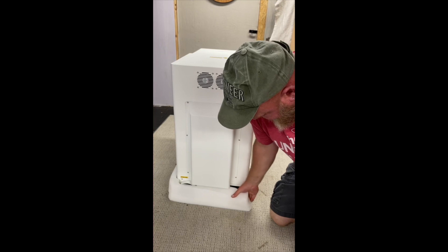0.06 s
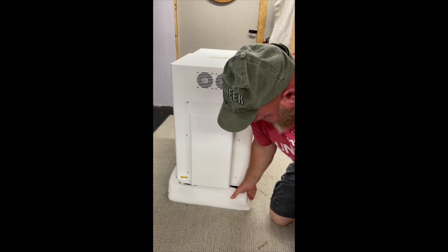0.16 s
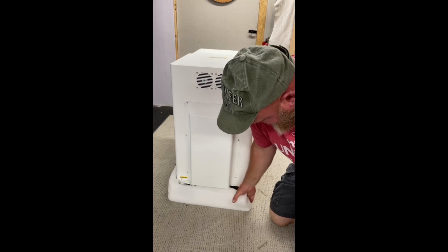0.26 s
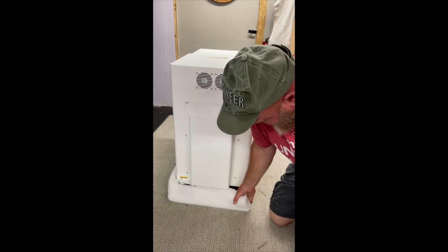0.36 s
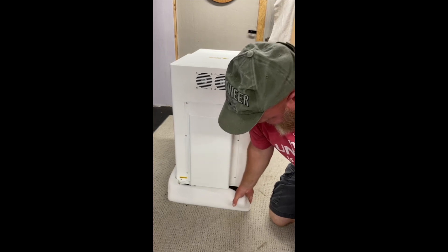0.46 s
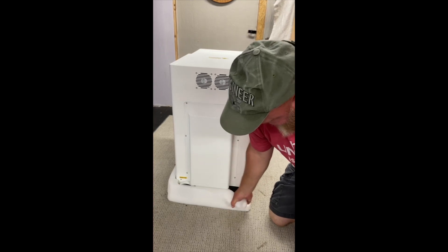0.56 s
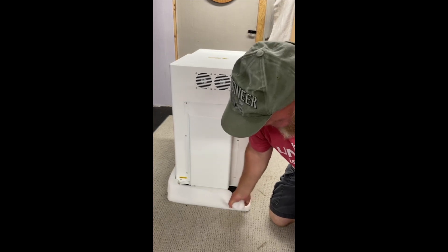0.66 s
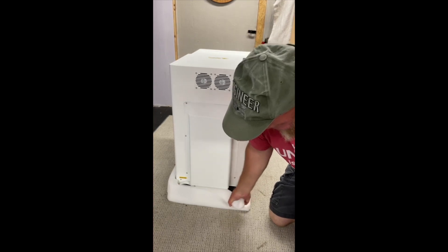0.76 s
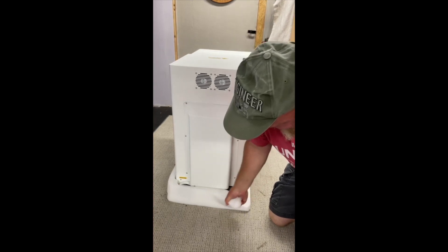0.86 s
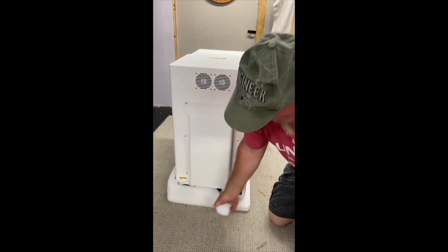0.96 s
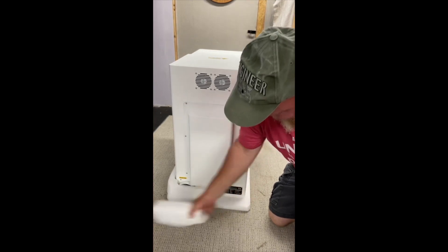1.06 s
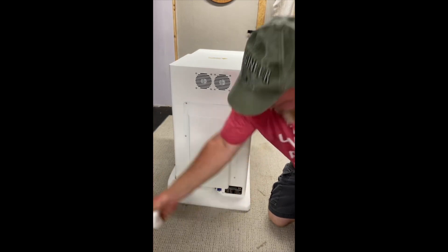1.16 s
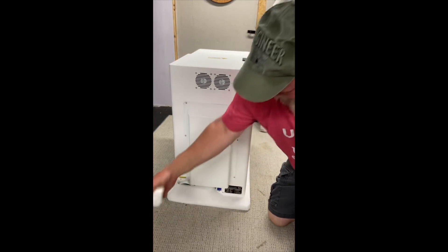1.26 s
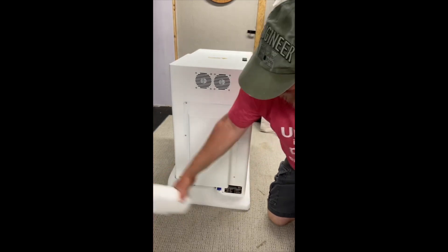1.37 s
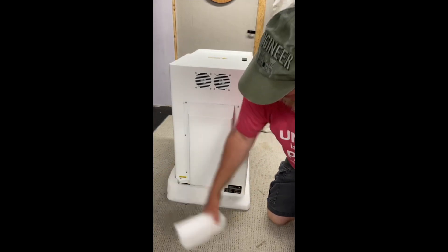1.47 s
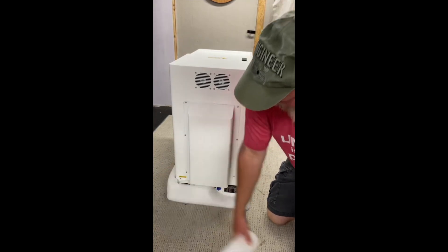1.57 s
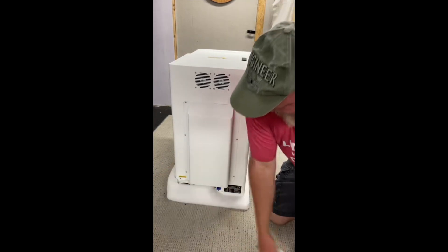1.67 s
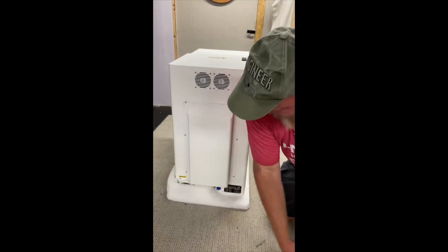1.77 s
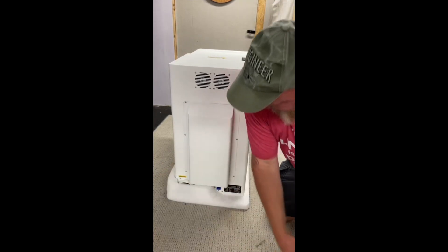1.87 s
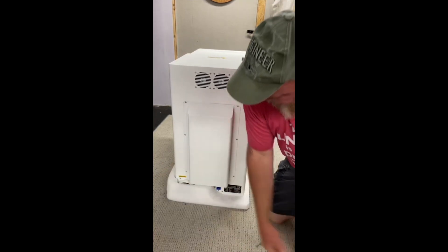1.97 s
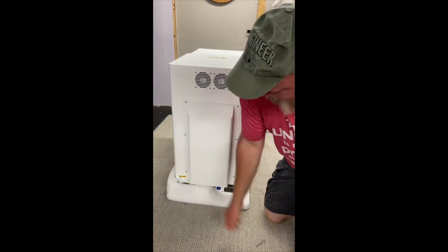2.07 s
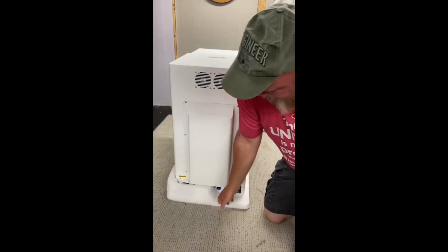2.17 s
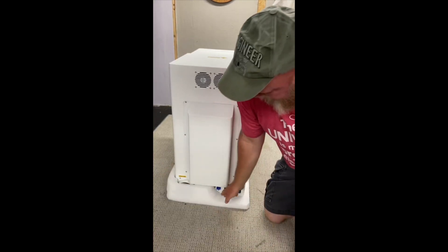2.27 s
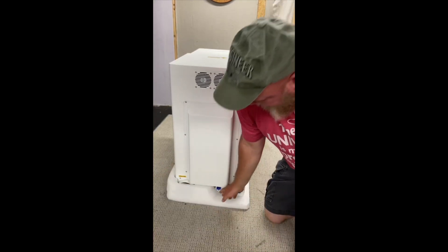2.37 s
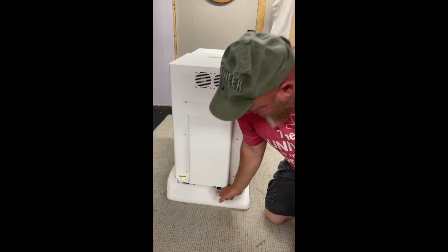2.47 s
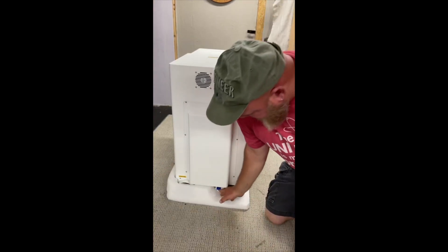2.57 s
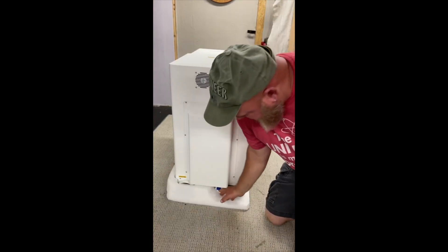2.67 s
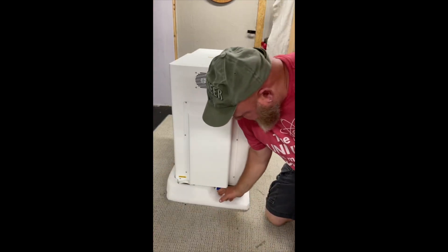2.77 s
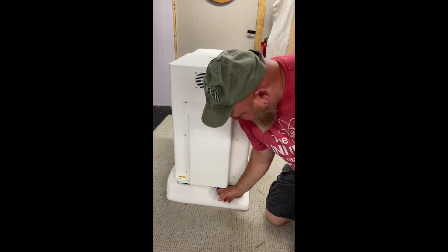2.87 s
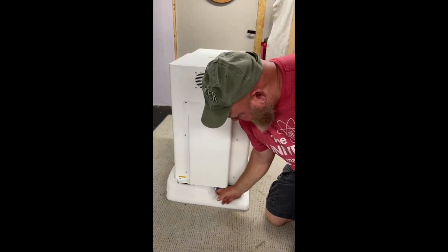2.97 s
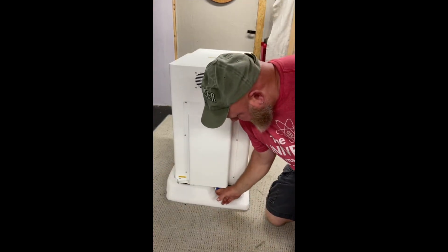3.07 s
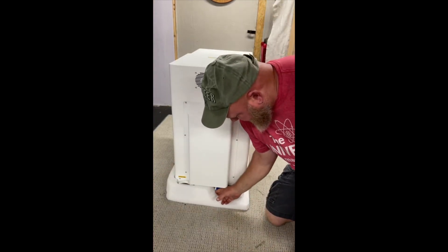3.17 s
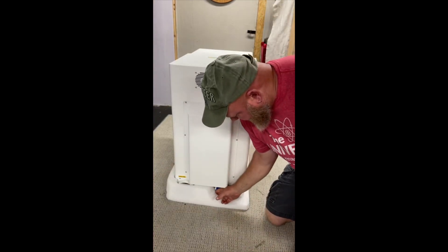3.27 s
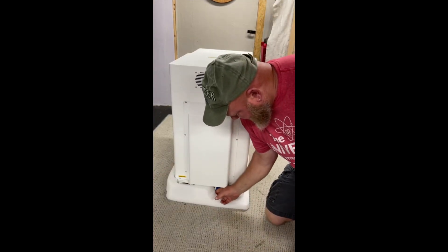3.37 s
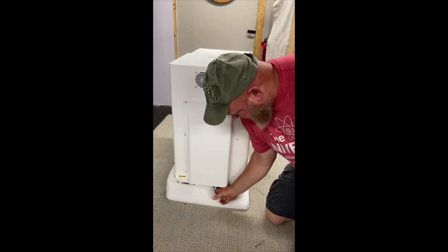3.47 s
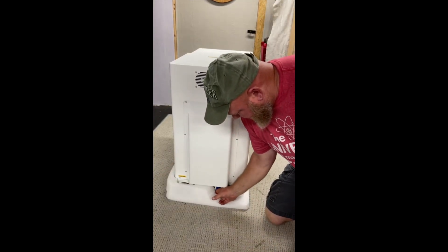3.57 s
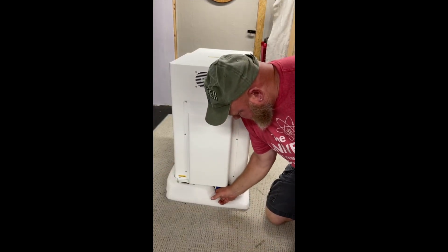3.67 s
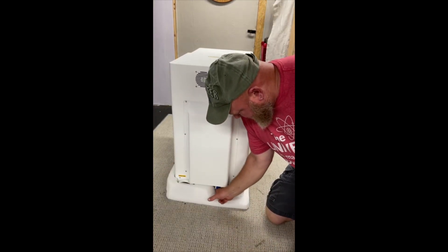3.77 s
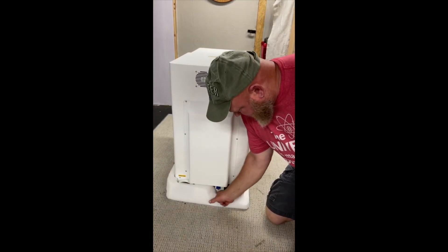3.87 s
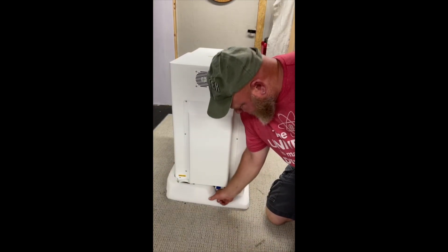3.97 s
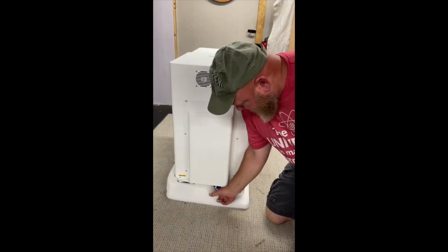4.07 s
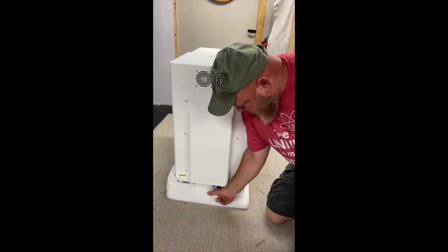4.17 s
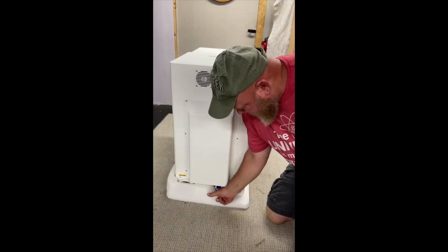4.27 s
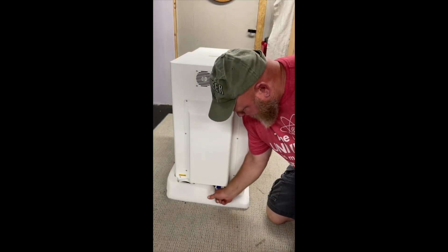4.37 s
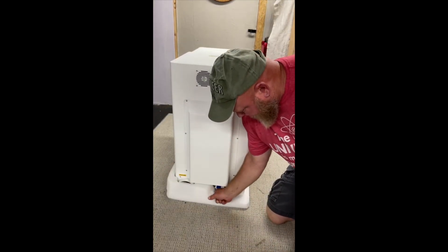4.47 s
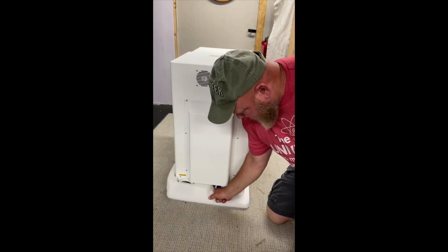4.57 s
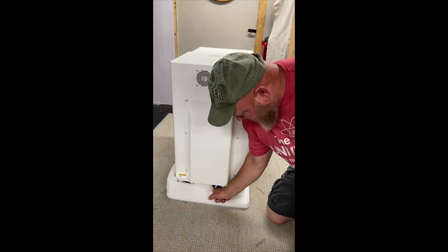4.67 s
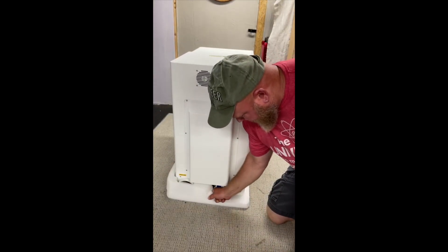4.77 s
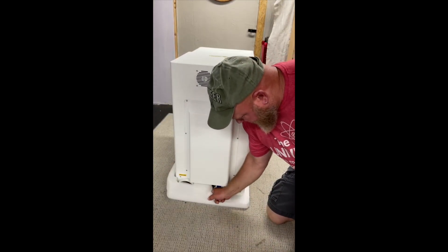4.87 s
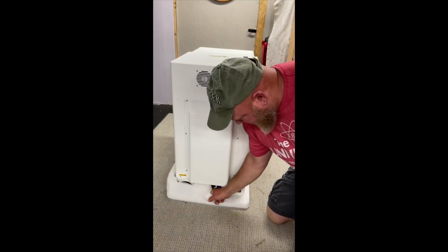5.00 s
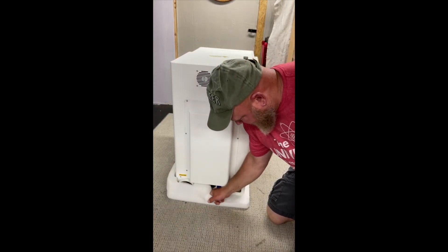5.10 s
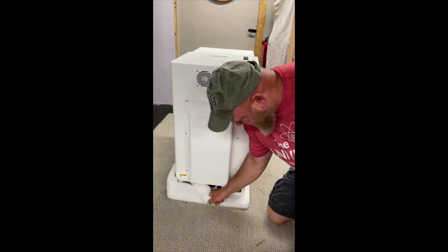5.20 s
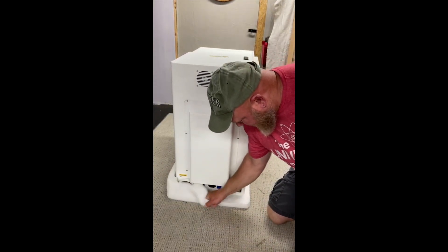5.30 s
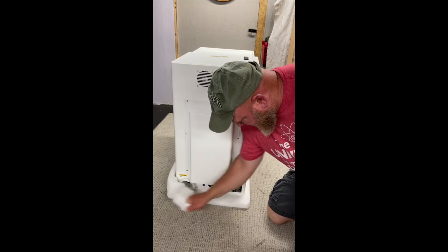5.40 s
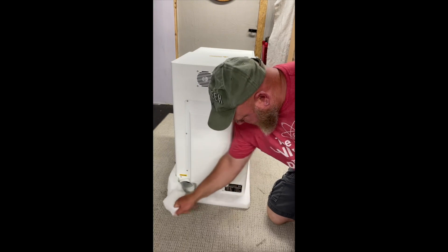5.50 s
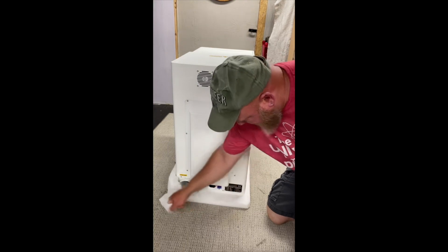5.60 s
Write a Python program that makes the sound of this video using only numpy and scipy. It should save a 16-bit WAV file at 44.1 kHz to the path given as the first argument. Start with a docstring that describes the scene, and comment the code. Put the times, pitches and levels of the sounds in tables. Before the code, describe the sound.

Foam packing is gripped, squeaked and torn loose in a loud crackling burst, then quiet fiddling, scattered snaps and a second tearing burst indoors.

```python
"""Tearing foam under a metal cabinet

A hand grips, rubs and tears pieces off the foam base under a sheet-metal cabinet in a small carpeted room.
Crackle is dense random cell bursts; squeak and rasp are swarms of damped notes that ring the block.
Fibres snap as noise cracks with a short ring; thumps are sagging low tones with a puff that rattles the panels.
A phone's two microphones hear it from the left, over a low, slowly wavering noise rumble."""
import sys
import numpy as np
from scipy import signal
from scipy.fft import rfft, irfft, next_fast_len
from scipy.io import wavfile
from scipy.ndimage import uniform_filter1d, map_coordinates

SR = 44100
rng = np.random.default_rng(int(sys.argv[2]) if len(sys.argv) > 2 else 0)


def digitize_waveform(pressure):
    """Quantize a signal to 16-bit integers and store it at the path in sys.argv[1].

    Rows of a 2-D input are taken as channels; values are limited to [-1, 1].
    """
    field = np.atleast_2d(pressure).T
    bounded = np.clip(field, -1, 1)
    quanta = np.round(bounded * 32767).astype(np.int16)
    wavfile.write(sys.argv[1], SR, quanta)


N = 248724

# Source levels in the tables are relative: the mix trims them further.
# Tugs at the foam; rise and fall each span 20 dB:
# (peak time [s], crackle level [dB], rise [s], fall [s],
#  squeak over crackle [dB], squeak pitch [Hz], rasp over crackle [dB])
TUGS = [(0.125, -42, 0.065, 0.1, 3.5, 918, -1), (0.271, -44.5, 0.032, 0.045, 1, 1006, 5),
        (0.46, -36, 0.015, 0.21, 5, 896, -10), (.53, -37.5, 0.066, 0.15, -8, 907, -5),
        (0.599, -38.5, 0.091, 0.036, 5.5, 927, 3.5), (0.72, -35, 0.033, 0.12, 1.5, 900, -7),
        (0.838, -29, 0.075, 0.097, 6.5, 973, 0.5), (0.973, -28.5, 0.092, 0.084, 2.5, 1250, -12.5),
        (1.024, -29.5, 0.036, 0.082, 4.5, 620, -4), (1.052, -22, 0.023, 0.017, 5, 638, -0.5),
        (1.341, -50.5, .03, 0.063, -14, 1165, 2), (1.524, -58, 0.099, 0.068, -4, 981, 11.5),
        (1.77, -59, 0.051, 0.04, -3.5, 1220, 3), (1.949, -60, 0.018, 0.051, -13, 745, -13),
        (1.991, -67.5, 0.023, 0.097, 0.5, 886, 15), (2.2, -67.5, 0.029, 0.31, 5, 596, 15),
        (2.66, -78.5, 0.041, 0.33, 13, 806, 19), (2.824, -68.5, 0.13, 0.14, 16, 933, -5),
        (2.961, -63.5, 0.15, 0.062, 13.5, 984, -1), (3.22, -68, 0.11, 0.11, 7.5, 873, 3),
        (3.384, -56.5, 0.08, 0.12, 6, 860, 8), (3.489, -67, 0.21, 0.061, 5.5, 1090, -9),
        (3.562, -68, .015, 0.098, -13.5, 640, -5), (3.614, -67, 0.096, 0.045, 3, 817, -3.5),
        (3.681, -57, 0.041, 0.068, 4.5, 1074, 0.5), (3.736, -59.5, 0.07, 0.021, 2, 915, -4),
        (3.79, -63, 0.072, 0.05, -3.5, 1122, -4.5), (3.822, -33, 0.018, 0.066, 4.5, 845, 7),
        (3.867, -44, 0.067, 0.044, 12.5, 793, 6.5), (4.022, -56.5, 0.038, 0.11, 3.5, 807, 14.5),
        (4.064, -65, 0.041, 0.23, 11, 883, 13.5), (4.255, -52, 0.034, 0.071, 8.5, 899, 8.5),
        (4.296, -56.5, 0.044, 0.069, 7, 827, 14.5), (4.36, -41, 0.015, 0.048, 4.5, 720, 2),
        (4.524, -51.5, 0.096, 0.18, 2.5, 1123, -2.5), (4.653, -46, 0.12, 0.041, 1.5, 1113, -8),
        (4.767, -48.5, 0.077, 0.14, -0.5, 1133, -20.5), (4.884, -49, 0.046, 0.26, 0.5, 854, -19),
        (4.948, -62, 0.14, 0.28, -4, 1164, -9), (5.086, -53, 0.14, .1, -4.5, 1183, -5.5),
        (5.16, -39, 0.07, 0.067, -8.5, 953, -1), (5.278, -38, 0.088, 0.08, 1.5, 663, -12),
        (5.356, -26.5, 0.075, 0.089, 2, 695, 10), (5.423, -35, 0.2, 0.066, -4.5, 972, -5),
        (5.53, -59.5, 0.054, 0.028, 17, 900, 16.5)]
# Steady grip between tugs: (time [s], faint crackle level [dB], cabinet shake level [dB])
GRIP = [(0, -58, -58), (.42, -72, -70), (.48, -72, -49), (.6, -72, -60.5), (.68, -72.5, -71.5),
        (.83, -62, -55.5), (.91, -62, -54.5), (.95, -58.5, -33.5), (1.01, -59.5, -35), (1.1, -63.5, -35),
        (1.17, -66.5, -54), (1.3, -70.5, -59.5), (1.4, -73, -65.5), (1.7, -90.5, -68), (2.15, -80.5, -62),
        (2.6, -75.5, -62), (3.1, -80.5, -62.5), (3.6, -78, -61.5), (4.0, -67, -58.5), (4.5, -70.5, -64),
        (5.0, -61.5, -79), (5.3, -66.5, -54), (5.36, -68, -37.5), (5.44, -65.5, -51), (5.5, -66.5, -56.5),
        (5.64, -62.5, -57.5)]
# Tone of bursting cells: (frequency [Hz], gain [dB])
CELL_TONE = [(900, -51.5), (1500, 0.5), (2200, 0), (3300, 3), (4400, 0), (5200, 5.5), (7000, -2), (8500, 0),
             (10500, -3), (13000, -11.5), (15300, -10)]
# Modes of the foam block: (frequency [Hz], width [Hz], gain [dB])
BLOCK_MODES = [(533, 34, 3.5), (728, 53, -0.5), (895, 60, 1), (1187, 40, 4), (1502, 50, -3.5),
               (1676, 70, -5.5), (1960, 100, -6.5), (2300, 69, -0.5), (3245, 150, -9)]
# Modes of the cabinet panels: (frequency [Hz], width [Hz], gain [dB])
PANEL_MODES = [(105, 26, -2), (157, 30, -2), (205, 40, 2), (265, 60, -4), (322, 45, -2), (385, 40, -2),
               (450, 50, -8), (530, 50, -7)]
# Thick fibres parting: (time [s], level [dB], ring pitch [Hz])
SNAPS = [(0.059, -33.5, 2330), (0.095, -49, 970), (0.1223, -36, 934), (0.266, -38.5, 1170),
         (0.4365, -30.5, 849), (0.4557, -23.5, 901), (0.6847, -25, 882), (0.7216, -25, 5260),
         (0.742, -23.5, 1004), (0.816, -16.5, 1228), (0.8498, -19.5, 1216), (0.8769, -13.5, 1206),
         (0.96, -22, 1450), (0.976, -18, 1254), (1.029, -17, 985), (1.047, -6.5, 1717), (1.054, -3.5, 1910),
         (1.3372, -28.5, 2340), (1.4694, -40, 1004), (1.7376, -42, 2095), (1.764, -36, 1240),
         (1.9461, -36.5, 2060), (1.9873, -40.5, 976), (1.9983, -37, 778), (2.175, -44, 2050),
         (2.2008, -40, 850), (2.93, -44, 970), (3.197, -39.5, 840), (3.307, -41, 820), (3.343, -46, 2000),
         (3.3816, -40, 1243), (3.4727, -36, 1240), (3.482, -34, 5300), (3.5019, -38.5, 5180),
         (3.6145, -35, 5580), (3.6794, -36.5, 1236), (3.688, -47.5, 3000), (3.718, -39, 3200),
         (3.732, -35.5, 3290), (3.748, -49.5, 3200), (3.781, -34, 1308), (3.811, -24, 1303),
         (3.82, -20, 1570), (3.826, -13.5, 1480), (3.827, -20, 760), (3.849, -27.5, 1102),
         (4.251, -31, 2060), (4.2845, -41, 982), (4.363, -15.5, 700), (4.494, -30, 1150),
         (4.527, -32.5, 1165), (4.599, -30.5, 3000), (4.6095, -26.5, 3020), (4.636, -27, 1515),
         (4.653, -31.5, 1832), (4.715, -35, 1213), (4.7372, -36.5, 1242), (4.762, -42, 1248),
         (4.801, -28, 1730), (4.873, -22.5, 825), (4.885, -28, 1504), (4.899, -23.5, 3250),
         (4.9392, -17, 1290), (4.978, -33.5, 1590), (5.019, -30.5, 1690), (5.029, -31, 1648),
         (5.043, -28, 3050), (5.084, -28, 3140), (5.1295, -25.5, 5250), (5.141, -34.5, 1500),
         (5.1547, -15, 3080), (5.18, -18, 1657), (5.2188, -34, 5330), (5.234, -25, 3000),
         (5.242, -15, 1900), (5.2928, -27.5, 1690), (5.303, -30.5, 1708), (5.515, -32, 1237)]
# Pieces thumping cabinet and floor; the push, thud and overtone are tuned from one base pitch:
# (time [s], level [dB], base pitch [Hz], push T60 [s], rise time constant [s],
#  low thud over push [dB], rattle over push [dB])
THUMPS = [(1.019, -18, 379.6, 0.12, 0.0062, -14, -9.5), (1.051, -8, 480, .03, .001, -2, -8),
          (1.0574, 4, 265, 0.028, 0.002, -10.5, -14.5), (1.067, -15.5, 124, 0.12, 0.0077, -9.5, -12.5),
          (1.182, -28, 236.3, 0.081, 0.0034, -7.5, -12.5), (1.242, -36.5, 263, 0.047, .004, -2.5, -14),
          (1.948, -35, 127.6, 0.12, 0.00059, -1.5, -3.5), (1.996, -36.5, 90, 0.08, 0.00067, -17.5, -12),
          (2.202, -29.5, 225.5, 0.076, 0.0021, -2.5, -16), (2.386, -30, 116.4, 0.18, 0.018, -20, -24.5),
          (3.825, -22.5, 280, 0.056, 0.002, -24, -12.5), (3.862, -31, 215, 0.046, .002, -14.5, -12.5),
          (5.535, -27, 302.3, 0.052, 0.002, -5, -12.5)]
# Panel that hums on after each thump: (pitch [Hz], level over the thump [dB], T60 [s])
PANEL_HUM = (194, -55, 3.5)
# Tone of the house rumble: (frequency [Hz], gain [dB])
AIR_TONE = [(20, -8), (50, 10.5), (100, 8), (200, -18), (400, -20.5), (900, -12), (1500, -18.5),
            (2600, -21.5), (5000, -30), (10000, -87), (16000, -32)]
# Echo decay: (frequency [Hz], T60 [s])
ROOM_DECAY = [(100, 0.21), (500, 0.18), (2000, 0.19), (10000, 0.094)]
# Right microphone's direct path: (frequency [Hz], level under left [dB])
RIGHT_SHADE = [(60, 0), (170, 7), (330, 12), (600, 7.5), (950, 8.5), (1500, 4), (2000, 1), (3300, 4),
               (4700, -1.5), (5500, -0.5)]
# Right microphone's phase lag: (frequency [Hz], lag [half turns])
RIGHT_LAG = [(0, 0), (260, .35), (450, .9), (900, 1), (1100, 1.3), (1500, 1.95), (2000, 2.2), (2600, 2.9),
             (4300, 3), (4700, 3.5), (5300, 4), (5700, 4.05), (6500, 4.65), (7000, 5), (8500, 5),
             (9200, 5.35), (10000, 6), (12400, 6), (13200, 7), (16000, 7)]
# Left-right likeness: (frequency [Hz], likeness [0 to 1])
LIKENESS = [(30, 1), (80, 0.92), (200, 0.25), (500, 0.42), (1800, 0.78), (3500, 0.31), (4700, 1),
            (5400, 0.56), (6200, 0.19), (7000, 1), (8300, 1), (9200, 0.78), (10000, .995), (12000, 1),
            (12700, 0.25), (13300, 1)]

# The grip's squeak and rasp, over its faint crackle
GRIP_SQUEAK_DB, GRIP_SQUEAK_HZ, GRIP_RASP_DB = -1.5, 740, -18.5
SHAKE_DB, SHAKE_LAG_S = -13, 0.003  # squeaks pass into the panels, which answer late
BEADS_DB, BEADS_HZ = -2.5, 3400  # single beads breaking loose: mix gain, middle pitch
THROUGH_BLOCK = 1.8  # how far the block's modes lift squeak and rasp
JERK_DB = 2  # stick and slip: the squeak comes in jerks
SNAP_T60_S, KNOCK_DB = 0.011, -6  # decay of crack and ring; gain of the knock into the block
TICK_DB, TICK_T60_S = -11, 0.006  # the sharp front of each snap
AFTER_DB, AFTER_S = -15, 0.03  # weaker cracks after each snap: loudest, and spread in time
AIR_DB = -53
TOP_HZ = 15800  # phone's band limit


def foam():
    """The pull sets how loud cells burst, squeak, rasp and shake the cabinet."""
    crackling, squeaking, rasping, squeak_hz = pull()
    fine = bursts(per_s=12000, spread_db=3.0, clump_db=0.5, clump_rate=140)
    hiss = crackle(fine)
    beads = chirps(count=1500, centre_hz=np.full(N, BEADS_HZ), scatter=0.45, cycles=2, spread_db=2.6)
    mix = amp(0.5) * crackling * (hiss + amp(BEADS_DB) * beads)
    mix += amp(2.5) * squeaking * squeak(squeak_hz)
    mix += amp(-5.5) * rasping * rasp()
    return mix + amp(5.0) * cabinet_shake(fine, squeaking)


def pull():
    """Gains of crackle, squeak and rasp, and the squeak's pitch: tugs swell and die over the steady grip."""
    t = np.arange(0, N / SR + 0.002, 0.001)
    peak_s, db, rise, fall, squeak_db, squeak_hz, rasp_db = np.transpose(TUGS)[:, :, None]
    grip_db = np.interp(t, *np.transpose(GRIP)[:2])
    distance = np.where(t < peak_s, (peak_s - t) / rise, (t - peak_s) / fall)
    swell = amp(db - 20 * distance)

    def power(tug_db, rest_db):
        return np.vstack([swell * amp(tug_db), amp(grip_db + rest_db)]) ** 2

    squeak_power = power(squeak_db, GRIP_SQUEAK_DB)
    # the louder squeak dominates the pitch
    pitch = (np.append(squeak_hz, GRIP_SQUEAK_HZ) @ squeak_power) / squeak_power.sum(axis=0)
    powers = (power(0, 0), squeak_power, power(rasp_db, GRIP_RASP_DB))
    gains = [np.sqrt(p.sum(axis=0)) for p in powers]
    return [np.interp(np.arange(N) / SR, t, curve) for curve in gains + [pitch]]


def crackle(fine):
    """Bright patchy cell bursts, mixed with short notes about a drifting pitch."""
    bright = filtered(fine, lambda hz: amp(along(CELL_TONE, hz)))
    centre_hz = 3200 * amp(2.57 * wobble(12))
    notes = chirps(count=5000, centre_hz=centre_hz, scatter=0.262, cycles=5.1, spread_db=-1.5)
    return patchy(bright, patchy_db=3.5) + 0.48 * notes


def squeak(squeak_hz):
    """Slipping cell walls excite the block in jerks, with coarser slips beneath."""
    notes = chirps(count=4500, centre_hz=squeak_hz, scatter=0.2, cycles=4, spread_db=2.6)
    slips = bursts(per_s=1800, spread_db=2.5, clump_db=2.5, clump_rate=88)
    rough = patchy(filtered(slips, resonances(BLOCK_MODES)), patchy_db=6.0)
    return amp(JERK_DB * wobble(70)) * through_block(notes) + 0.5 * rough


def rasp():
    """Thin walls near the torn edge slip as very short notes through the block."""
    centre_hz = 1800 * amp(wobble(8))
    return through_block(chirps(count=7000, centre_hz=centre_hz, scatter=0.22, cycles=3, spread_db=2.5))


def cabinet_shake(fine, squeaking):
    """Cell bursts drive the panels, as loud as the grip and the lagging squeak gain allow."""
    late = filtered(squeaking, lambda hz: 1 / (1 + 2j * np.pi * hz * SHAKE_LAG_S))
    grip = amp(np.interp(np.arange(N) / SR, *np.transpose(GRIP)[::2]))
    drive = grip + amp(SHAKE_DB) * late
    panels = resonances(PANEL_MODES)
    return filtered(drive * fine, panels) / filtered(fine, panels).std()


def through_block(x):
    """The foam block's modes lift parts of x; rms 1."""
    return unit(filtered(x, lambda hz: 1 + THROUGH_BLOCK * np.abs(resonances(BLOCK_MODES)(hz))))


def bursts(per_s, spread_db, clump_db, clump_rate):
    """Cells burst at random moments, a few far harder than most, in clumps; rms 1."""
    moment, hardness, sign = rng.random((3, N))
    size = amp(-spread_db * np.log(hardness + 3e-3))
    clicks = (moment < per_s / SR) * size * np.sign(sign - 0.5)
    return unit(clicks * amp(clump_db * wobble(clump_rate)))


def chirps(count, centre_hz, scatter, cycles, spread_db):
    """Short damped notes of cell walls slipping: pitch scattered about a moving centre, rms 1."""
    draw, t = rng.random((count, 2)), np.arange(400)
    at = (draw[:, 0] * N).astype(int)
    hz = centre_hz[at] * np.exp(scatter * rng.standard_normal(count))
    turn = np.clip(hz, 100, SR / 3)[:, None] * t / SR
    size = amp(-spread_db * np.log(draw[:, 1:] + 1e-2))
    fade = np.hanning(800)[400:]
    notes = size * np.exp(-turn / cycles) * np.sin(2 * np.pi * turn) * fade
    return unit(np.bincount((at[:, None] + t).ravel(), notes.ravel(), N + 400)[:N])


def patchy(x, patchy_db):
    """Random gain patches over time and pitch: the torn edge changes colour as it moves."""
    z = signal.stft(x, nperseg=512)[2]
    field = uniform_filter1d(rng.standard_normal(z.shape), size=3, axis=0)
    field = uniform_filter1d(field, size=5, axis=1)
    return unit(signal.istft(z * amp(patchy_db * unit(field)), nperseg=512)[1][:N])


def snaps():
    """A thick fibre parts: a crack, a ring at its own pitch and a knock into the block; thinner ones follow."""
    crack, ring, tick = np.zeros((3, N + SR))
    t = np.arange(SR // 8) / SR
    events = list(SNAPS)
    for s, db, hz in SNAPS:
        for delay, drop, detune in rng.random((3, 3)):
            later = s + 0.004 + AFTER_S * delay
            events.append((later, db + AFTER_DB - 8 * drop, hz * amp(6.8 * detune - 2.5)))
    for s, db, hz in events:
        fall = amp(db + 3.0 - 60 * t / SNAP_T60_S) * (1 - np.exp(-t / 0.000079))
        at = slice(round(s * SR), round(s * SR) + len(t))
        crack[at] += fall * rng.standard_normal(len(t))
        tick[at] += amp(db + TICK_DB - 60 * t / TICK_T60_S) * rng.standard_normal(len(t))
        ring[at] += fall * np.sin(2 * np.pi * hz * t) * (900 / hz) ** 0.58  # low rings carry further
    # high-pass at 900 Hz, gentle low-pass at 4 kHz
    thin = filtered(crack[:N], lambda f: 1j * f / (1j * f + 900) / (1 + 1j * f / 4000) ** 2)
    front = filtered(tick[:N], lambda hz: amp(along(CELL_TONE, hz)))
    knock = filtered(crack[:N], resonances(BLOCK_MODES))
    return thin + front + 0.57 * ring[:N] + amp(KNOCK_DB) * knock


def thumps():
    """A soft push of a few cycles and a puff that rattles the panels; one panel hums on."""
    out, puffs = np.zeros((2, N + 2 * SR))
    t = np.arange(2 * SR) / SR
    hum_hz, hum_db, hum_t60 = PANEL_HUM
    for s, db, hz, t60, rise, thud_db, rattle_db in THUMPS:
        fall = amp(-60 * t / t60)
        start = amp(db + 5.0) * (1 - np.exp(-t / max(rise, 0.0005)))
        sag = t + 0.23 * 0.011 * (1 - np.exp(-t / 0.0034))  # pitch starts about 3/4 high and sags
        push = fall * np.sin(2 * np.pi * 0.834 * hz * sag)
        thud = fall ** 0.57 * (1 - np.exp(-t / 0.0045)) * np.sin(2 * np.pi * 0.389 * hz * t)
        overtone = 0.5 * fall ** 2.9 * np.sin(2 * np.pi * 1.4 * hz * t)
        hum_gain = amp(3 * wobble(16)[:len(t)] + hum_db - 60 * t / hum_t60)
        hum = hum_gain * np.sin(2 * np.pi * hum_hz * t)
        at = slice(round(s * SR), round(s * SR) + len(t))
        out[at] += start * (push + amp(thud_db) * thud + overtone + hum)
        puffs[at] += start * amp(rattle_db) * fall ** 1.2 * rng.standard_normal(len(t))
    panels = filtered(puffs[:N], resonances(PANEL_MODES))
    block = filtered(puffs[:N], resonances(BLOCK_MODES))
    return out[:N] + amp(15.5) * panels + amp(-16.5) * block


def room(x):
    """A noise-tail echo in which each frequency dies at its own speed."""
    hz, t, z = signal.stft(rng.standard_normal(SR // 2), SR, nperseg=256)
    decay = amp(-60 * t / along(ROOM_DECAY, hz)[:, None])
    tail = signal.istft(z * decay, SR, nperseg=256)[1]
    delayed = np.pad(x, (200, 0))
    return signal.fftconvolve(delayed, tail / np.linalg.norm(tail))[:N]


def air():
    """Low rumble of the house: shaped noise, wavering slowly."""
    rumble = unit(filtered(rng.standard_normal(N), lambda hz: amp(along(AIR_TONE, hz))))
    return amp(AIR_DB + 0.38 * wobble(1.7)) * rumble


def microphones(x):
    """The right port lags, is shaded in the bass, and partly hears other paths of ever-changing phase."""
    z = signal.stft(x, SR, nperseg=256)[2]
    scrambled = z * np.exp(2j * np.pi * rng.random(z.shape))
    other = signal.istft(scrambled, SR, nperseg=256)[1][:N]
    other = other * x.std() / other.std()

    def alike(f):
        return np.clip(np.interp(f, *np.transpose(LIKENESS)), 0, 1)

    def path(f):
        return amp(-along(RIGHT_SHADE, f)) * np.exp(-1j * np.pi * np.interp(f, *np.transpose(RIGHT_LAG)))

    direct = filtered(x, lambda f: path(f) * alike(f))
    indirect = filtered(other, lambda f: path(f) * np.sqrt(1 - alike(f) ** 2))
    return np.array([x, direct + indirect])


def amp(db):
    """Decibels to linear gain."""
    return 10 ** (np.asarray(db) / 20)


def unit(x):
    """x scaled to rms 1."""
    return x / np.sqrt(np.mean(x ** 2) + 1e-20)


def along(points, hz):
    """Read (Hz, value) points on a log frequency axis."""
    f, v = np.transpose(points)
    return np.interp(np.log(hz + 1), np.log(f + 1), v)


def wobble(rate):
    """A smooth random curve, rate knots a second."""
    knots = rng.standard_normal(int(N * rate / SR) + 4)
    return map_coordinates(knots, [np.arange(N) * rate / SR])


def filtered(x, response):
    """x times a complex response of frequency."""
    m = next_fast_len(N + SR // 2)
    return irfft(rfft(x, m) * response(np.fft.rfftfreq(m, 1 / SR)), m)[..., :N]


def resonances(modes):
    """Causal response of damped modes (Hz, width Hz, dB), summed with alternating sign."""
    def response(f):
        return sum((-1) ** k * amp(db) * 1j * f * width / (centre ** 2 - f * f + 1j * f * width)
                   for k, (centre, width, db) in enumerate(modes))
    return response


def scene():
    """Foam, snaps and thumps with their echo, over the rumble, at two microphones."""
    near = foam() + snaps() + thumps()
    return microphones(near + amp(-9.0) * room(near) + air())


def record(dry):
    """The phone loses the deepest bass, rounds off the highest peaks and keeps nothing above its band limit."""
    dry = filtered(dry, lambda hz: (1j * hz / (1j * hz + 40)) ** 3)
    dry = dry / (1 + np.abs(dry / 0.97) ** 6) ** (1 / 6)
    return filtered(dry, lambda hz: hz < TOP_HZ)


dry = scene()
out = record(dry)
digitize_waveform(out)
```